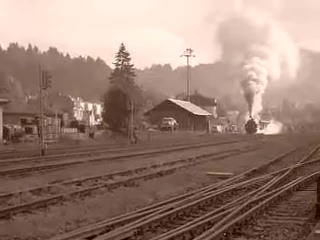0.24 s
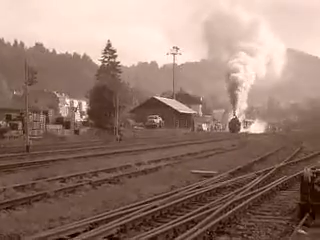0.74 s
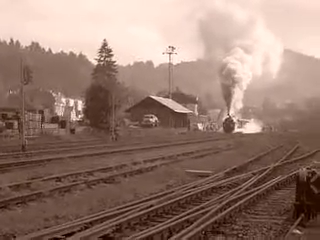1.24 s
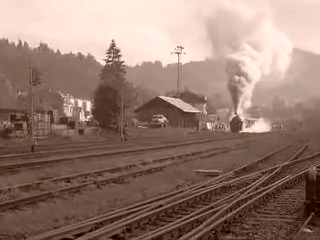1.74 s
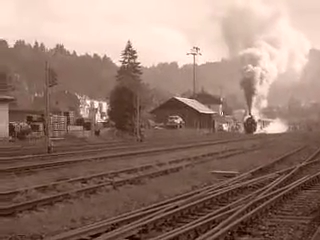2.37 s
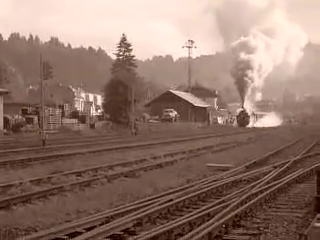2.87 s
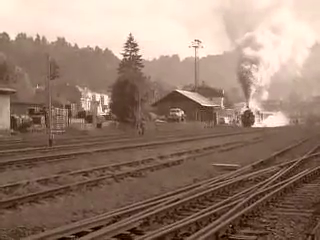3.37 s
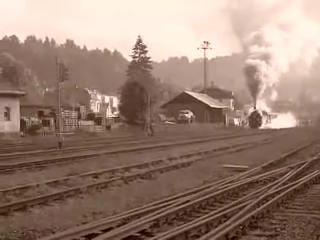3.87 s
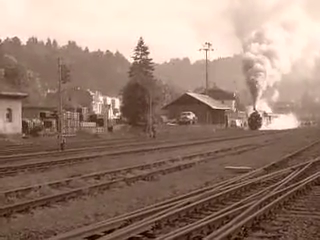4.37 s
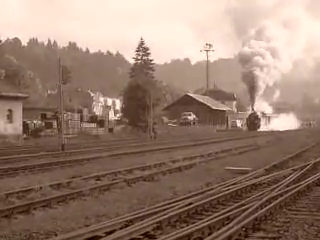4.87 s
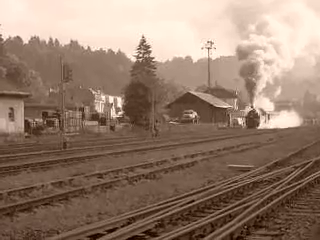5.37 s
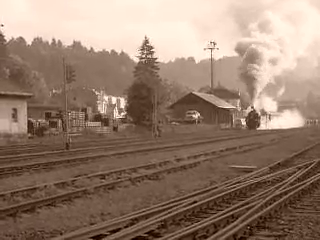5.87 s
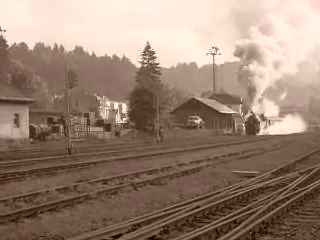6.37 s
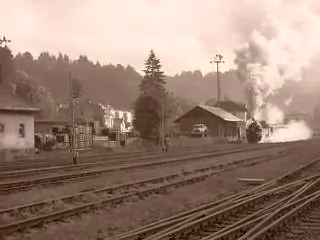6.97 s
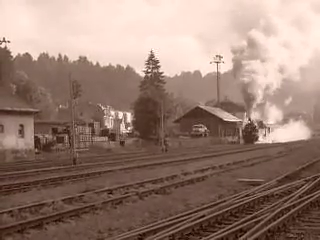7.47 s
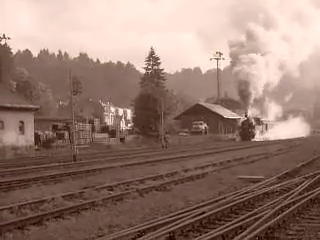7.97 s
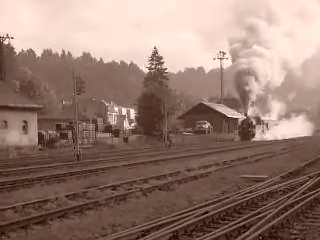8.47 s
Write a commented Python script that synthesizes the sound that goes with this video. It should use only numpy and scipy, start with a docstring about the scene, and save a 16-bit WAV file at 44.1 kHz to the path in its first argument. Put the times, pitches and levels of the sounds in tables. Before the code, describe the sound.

A steam locomotive approaches, its piercing steam hiss surging about once a second over softer, quickening chuffs.

```python
"""Steam locomotive pulling out

An engine leaves a country station and comes toward us, drain cocks open. Steam hisses in one surge
for each turn of the wheels, heard with a narrow, piercing ring near 3 kHz, and brightens as it nears.
Underneath, the chimney chuffs four times a turn, faster and faster, smeared by the wooded valley.
The firebox draught drones, and a few tiny ticks snap close by."""
import sys
import numpy as np
from scipy import signal
from scipy.fft import rfft, irfft
from scipy.io import wavfile

SR = 44100
rng = np.random.default_rng(int(sys.argv[2]) if len(sys.argv) > 2 else 0)


def wav_record(signal):
    """Record a signal, one row per channel, as 16-bit PCM in the file named by sys.argv[1]."""
    frames = np.transpose(np.atleast_2d(signal))
    bounded = np.clip(frames, -1, 1)
    # unit amplitude maps onto the largest positive 16-bit level
    quanta = np.round(bounded * 32767).astype(np.int16)
    wavfile.write(sys.argv[1], SR, quanta)


N = 384993
TIME = np.arange(N) / SR

# The ring's colour: engine far, midway and near. Each row: frequency in Hz, relative level in dB.
RING_FAR = [(1060, -62.5), (1800, -43.5), (2010, -29), (2750, -2.5), (3130, 1.5), (3450, -4.5), (3800, -18),
            (4050, -19.5), (4400, -31.5), (5720, -57.5), (9680, -120)]
RING_MIDWAY = [(1400, -49), (1800, -27.5), (2100, -23), (2400, -13.5), (2700, -7), (2900, 0), (3080, 3),
               (3270, -2.5), (3480, -12), (3700, -21.5), (3950, -21), (4250, -38.5), (4800, -53)]
RING_NEAR = [(1060, -44.5), (1800, -22), (2120, -19), (2500, -1.5), (2680, 1), (3250, -2), (4220, -18),
             (4400, -18.5), (5720, -48), (9680, -120)]
# The jets' hiss: broad sizzle, fine spray on top. Each row: frequency in Hz, relative level in dB.
SIZZLE_COLOUR = [(900, -19.5), (1900, -4.5), (3700, 4.5), (4250, 0), (4900, -1.5), (5600, -1.5),
                 (6500, -6.5), (7400, -13.5), (8600, -29.5), (10000, -47.5)]
SPRAY_COLOUR = [(5500, -27.5), (7000, -1.5), (7900, 2.5), (8800, -1), (9600, -4), (10300, -12),
                (11200, -22.5), (12200, -33.5)]
# A higher peak in the sizzle. Each row: time in seconds, centre in Hz, lift in dB.
SIZZLE_OVERTONE = [(0, 5280, 4), (1.6, 5280, 5), (3.4, 4980, 3), (4.2, 4910, 8.5), (5.0, 4740, 9.5),
                   (5.9, 4690, 4.5), (7.0, 4620, 4.5), (8.73, 4410, 1)]
# How the hiss reaches us. Each row: time in seconds, lag of the ground bounce in ms,
# its strength from 0 to 1, the spray's treble tilt in dB per octave.
HISS_PATH = [(0, .335, .8, -5.5), (.9, .345, .62, -10), (2.5, .348, .65, -6), (3.6, .358, 0.8, -5),
             (4.6, .365, .7, 0), (5.3, .366, .55, -1.5), (5.7, 0.43, .1, 4.5), (6.2, .434, 0.3, 3),
             (7.0, .44, 0.5, 5), (7.6, .448, 0.9, -3), (8.73, .474, .6, -2)]
# The leak between surges. Each row: time in seconds, relative ring, sizzle and spray levels in dB.
STEADY_LEAK = [(0, -27, -49.5, -65.5), (1.2, -24.8, -48.5, -61.5), (2.1, -22.5, -47, -61),
               (2.9, -21.5, -42, -58), (4.5, -20, -42.5, -58.5), (5.5, -22, -44.5, -58.5),
               (6.9, -22.5, -41, -56), (7.6, -20, -38.5, -50), (8.73, -19, -35.5, -49.5)]
# One surge for each turn of the wheels. Each row: swell of the ring, sizzle and spray in dB.
SURGES = [(6, 5, 3.5), (5.5, 6.5, 4), (3.5, 4, 4.2), (7, 4.5, 7.3), (7, 4, 1.5), (6.5, 4.5, 4),
          (5.5, 5.2, 3), (6, 4.5, 3), (5, 6, 3.5), (4, 4.9, 3.4), (3.5, 4, 3.5)]
# The voice of the stack. Each row: frequency in Hz, relative level in dB.
CHIMNEY_COLOUR = [(50, -24), (100, -8.5), (160, -11), (260, -11.5), (340, -10.5), (420, -7.5), (520, -1.5),
                  (610, -2), (750, 2), (1020, -7), (1240, -0.5), (1450, -2.5), (1680, -8), (2000, -9.5),
                  (2600, -22)]
# The four beats of a turn. Each row: place in the turn from 0 to 1, accent in dB, treble bark in dB.
EXHAUST_BEATS = [(.237, 1, 0.2), (.499, -.1, -.5), (.754, .4, 0), (.992, 0, -0.2)]
# The chimney drawing near. Each row: time in seconds, relative levels in dB of the steady roar
# (draught and rolling train) and of the chuffs.
EXHAUST_LEVELS = [(0, -46, -38.5), (.8, -42, -38.5), (2.4, -40.5, -38.5), (4.0, -40, -38),
                  (5.5, -38, -38.5), (6.4, -39, -38), (7.2, -38, -35.5), (8.73, -35, -35)]
# The firebox draught's deep drone. Each row: time in seconds, relative level in dB.
DRONE_LEVELS = [(0, -63), (2.3, -65), (3.0, -58.5), (4.1, -58), (4.65, -50.5), (5.1, -59), (5.5, -52),
                (6, -60), (8.73, -55.5)]
# The engine's hollow hums. Each row: time in seconds, relative levels of the low and high hum in dB.
HUM_LEVELS = [(0, -86, -62.5), (1.6, -74.5, -61.5), (3.2, -66.5, -56.5), (4.2, -68, -57.5),
              (6.4, -62.5, -56), (7.0, -55, -59.5), (7.9, -52, -59), (8.73, -52.5, -58)]
# The yard's low rumble. Each row: frequency in Hz, relative level in dB.
RUMBLE_COLOUR = [(15, -15.5), (30, -8.5), (45, -0.5), (80, 1), (130, -10), (250, -25)]
# Tiny close ticks. Each row: time in seconds, relative peak in dB.
TICKS = [(3.3508, -33), (3.4256, -36), (5.8556, -27), (6.0893, -21.5), (7.1565, -17)]

# Envelopes of a surge. Each gives start, rise, hold and release, all in turns of the wheels.
RING_STROKE = (.005, .085, .29, .33)
SIZZLE_STROKE = (.028, .08, .3, .38)
SPRAY_STROKE = (.01, .32, .41, .045)
SPIT_STROKE = (.68, .04, .025, .025)  # water spits out just before the cock shuts
RETURN_STROKE = (.764, .029, .088, .044)  # a short, weaker swell on the piston's way back

FRAME, HOP = 1024, 256  # in samples: the grid on which the steam changes colour
FRAME_TIME, FRAME_HZ = np.arange(N // HOP + 5) * HOP / SR, np.fft.rfftfreq(FRAME, 1 / SR)


def gain_of(db):
    """Decibels to amplitude."""
    return 10 ** (np.asarray(db) / 20)


def unit_rms(x):
    """Scales to rms 1."""
    return x / np.sqrt(np.mean(x ** 2) + 1e-20)


def eq_gain(colour, hz):
    """A colour table's gain at hz, drawn on a log-frequency axis."""
    points_hz, db = np.transpose(colour)
    return gain_of(np.interp(np.log(hz + 1), np.log(points_hz + 1), db, left=-100, right=-100))


def follow(rows, t):
    """Each column of an automation table at the times t."""
    seconds, *columns = np.transpose(rows)
    return [np.interp(t, seconds, column) for column in columns]


def bell(hz, centre_hz, width_hz):
    """The curve of a resonance, 1 at its centre."""
    return 1 / (1 + ((hz - centre_hz) / width_hz) ** 2)


def tinted_noise(colour):
    """Noise of rms 1, shaped by the gain curve colour(hz)."""
    return unit_rms(irfft(rfft(rng.standard_normal(N)) * colour(np.fft.rfftfreq(N, 1 / SR)), N))


def wander(rate_hz):
    """A random wobble of rms 1, moving at around rate_hz."""
    return tinted_noise(lambda hz: hz / rate_hz / (1 + (hz / rate_hz) ** 3))


def shifting_noise(colour):
    """Noise at an even level whose colour (frames by bins) keeps moving."""
    colour = colour / np.linalg.norm(colour, axis=1, keepdims=True)
    real, imag = rng.standard_normal((2,) + colour.shape)
    _, noise = signal.istft(((real + 1j * imag) * colour).T, nperseg=FRAME, noverlap=FRAME - HOP)
    return unit_rms(noise[:N])


def wheel_turns(t, first_surge_s=.4244, turns_per_s=1.0612, turns_per_s2=.04515):
    """Turns of the driving wheels, evenly gaining speed: the clock for every surge and chuff."""
    age = t - first_surge_s
    return turns_per_s * age + turns_per_s2 * age ** 2 / 2


def stroke(shape, turns):
    """How far a cock is open, 0 to 1: it rises, holds and shuts once a turn."""
    return np.interp(turns % 1, np.cumsum(shape), [0, 1, 1, 0])


def piercing_ring(leak_pitch=.99, sharpen=.018):
    """A narrow ring near 3 kHz heard in the hiss: it slowly widens, and lifts in pitch on each surge."""
    nearness = np.interp(FRAME_TIME, (2.2, 3.8, 4.5, 8.2), (.17, .82, 1, 1.76))[:, None]
    pitch = leak_pitch + sharpen * stroke(RING_STROKE, wheel_turns(FRAME_TIME))[:, None]
    blend = 0
    for stage, colour in enumerate((RING_FAR, RING_MIDWAY, RING_NEAR)):
        crossfade = np.maximum(1 - abs(nearness - stage), 0)
        blend += crossfade * eq_gain(colour, FRAME_HZ / pitch)
    return shifting_noise(blend)


def jet_hiss(notch_narrowing=.67, tilt_above_hz=7000):
    """Sizzle and spray, combed by their bounce off the ground."""
    hz, t = FRAME_HZ, FRAME_TIME[:, None]
    # on approach the bounce lags more, so its notches slide down; the air swallows less treble
    lag_ms, bounce, tilt_db = follow(HISS_PATH, t)
    reflection = bounce * np.exp(-2j * np.pi * hz * lag_ms / 1000)
    comb = abs(1 + reflection) / abs(1 + notch_narrowing * reflection)
    overtone_hz, lift_db = follow(SIZZLE_OVERTONE, t)
    overtone = gain_of(lift_db * bell(hz, overtone_hz, width_hz=330))
    tilt = gain_of(tilt_db * np.log2(np.maximum(hz / tilt_above_hz, 1)))
    sizzle = shifting_noise(comb * eq_gain(SIZZLE_COLOUR, hz) * overtone)
    spray = shifting_noise(comb * eq_gain(SPRAY_COLOUR, hz) * tilt)
    return sizzle, spray


def drain_cocks(return_db=2.5, spit_db=2.2, sizzle_trim_db=4, flutter_db=.5, flutter_hz=12):
    """Turbulent steam jets: a steady leak that swells with each stroke of the piston."""
    turns = wheel_turns(TIME)
    surge = np.clip(turns.astype(int), 0, len(SURGES) - 1)
    ring_swell, sizzle_swell, spray_swell = np.array(SURGES)[surge].T * (turns >= 0)
    ring_db, sizzle_db, spray_db = follow(STEADY_LEAK, TIME)
    ring_db += ring_swell * stroke(RING_STROKE, turns) + return_db * stroke(RETURN_STROKE, turns)
    sizzle_db += sizzle_swell * stroke(SIZZLE_STROKE, turns) + sizzle_trim_db
    spray_db += spray_swell * stroke(SPRAY_STROKE, turns) + spit_db * stroke(SPIT_STROKE, turns)
    ring = piercing_ring() * gain_of(ring_db + flutter_db * wander(flutter_hz))
    sizzle, spray = jet_hiss()
    hiss = sizzle * gain_of(sizzle_db) + spray * gain_of(spray_db)
    return ring + hiss * gain_of(flutter_db * wander(flutter_hz))


def chimney(chuff_trim_db=-.8, roar_trim_db=-.3, rise_s=.015, blast_s=.04, decay_s=.063,
            echo_s=.06, echo_db=-10, bark_hz=1000):
    """Each exhaust beat blows a burst of noise up the stack over a roar; the hillside throws it back."""
    roar_db, chuff_db = follow(EXHAUST_LEVELS, TIME)
    turns = wheel_turns(TIME)
    turns_per_s = np.gradient(turns, TIME)
    low_power, high_power = np.zeros((2, N))
    for place, accent_db, bark_db in EXHAUST_BEATS:
        age = (turns - place) % 1 / turns_per_s
        # the valve snaps open, then the cylinder empties
        blast = np.minimum(age / rise_s, 1) ** 2 * np.exp(-np.maximum(age - blast_s, 0) / decay_s)
        beat_power = blast * gain_of(chuff_db + accent_db + chuff_trim_db) ** 2
        low_power += beat_power
        high_power += beat_power * gain_of(bark_db) ** 2
    roar_power = gain_of(roar_db + roar_trim_db) ** 2
    exhaust = tinted_noise(lambda hz: eq_gain(CHIMNEY_COLOUR, hz))
    low = signal.sosfiltfilt(signal.butter(4, bark_hz, fs=SR, output="sos"), exhaust)
    out = np.zeros(N)
    for band, power in ((low, low_power), (exhaust - low, high_power)):
        echo_power = np.interp(TIME - echo_s, TIME, power) * gain_of(echo_db) ** 2
        out += band * np.sqrt(power + echo_power + roar_power)
    return out


def firebox_drone(pitch_hz=52, drift_hz=1.5, waver_db=2, wobble_hz=4.5, trim_db=-4):
    """The draught through the firebox: one deep tone, unsteady in pitch and level."""
    cycles = np.cumsum(pitch_hz + drift_hz * wander(wobble_hz)) / SR
    level_db = follow(DRONE_LEVELS, TIME)[0] + trim_db + waver_db * wander(wobble_hz)
    return np.sqrt(2) * np.sin(2 * np.pi * cycles) * gain_of(level_db)


def engine_hums(trim_db=-1):
    """The draught hums in two narrow, hollow resonances of the engine."""
    low_db, high_db = follow(HUM_LEVELS, TIME)
    low = tinted_noise(lambda hz: bell(hz, centre_hz=180.5, width_hz=11))
    high = tinted_noise(lambda hz: bell(hz, centre_hz=230, width_hz=24))
    return low * gain_of(low_db + trim_db) + high * gain_of(high_db + trim_db)


def yard_rumble(level_db=-62):
    """A faint, steady bed of low noise from the yard."""
    return tinted_noise(lambda hz: eq_gain(RUMBLE_COLOUR, hz)) * gain_of(level_db)


def ticks(trim_db=2, pitch_hz=8200, width_s=.00008):
    """Single bright snaps, a fraction of a millisecond long."""
    out = np.zeros(N)
    for at_s, peak_db in TICKS:
        near = abs(TIME - at_s) < 10 * width_s
        age = TIME[near] - at_s
        snap = np.exp(-(age / width_s) ** 2) * np.cos(2 * np.pi * pitch_hz * age)
        out[near] += snap * gain_of(peak_db + trim_db)
    return out


def scene():
    """The whole locomotive, in mono from beside the track."""
    return (drain_cocks() + chimney() + firebox_drone() + engine_hums() + yard_rumble() + ticks())[None]


def record(dry):
    """A steep high cut takes the very top off the mix."""
    high_cut = signal.firwin(301, cutoff=12100, window=("kaiser", 9), fs=SR)
    return signal.oaconvolve(dry, high_cut[None], "same")


dry = scene()
out = record(dry)
wav_record(out)
```